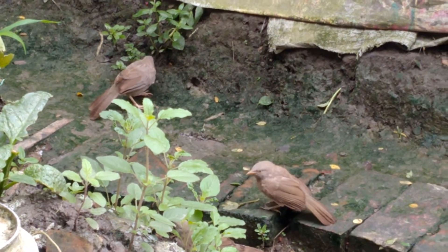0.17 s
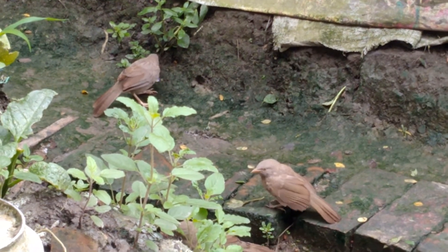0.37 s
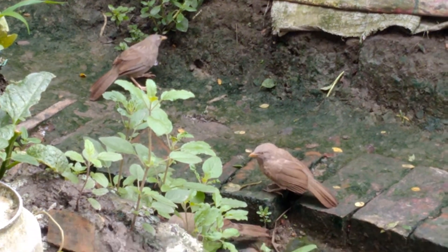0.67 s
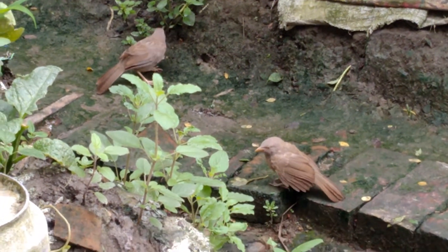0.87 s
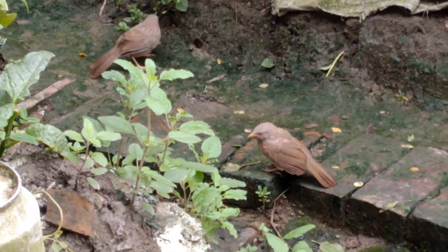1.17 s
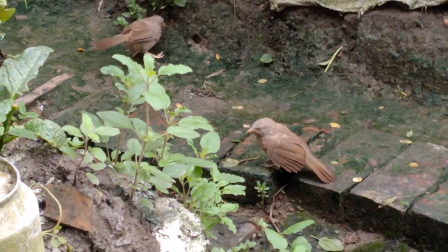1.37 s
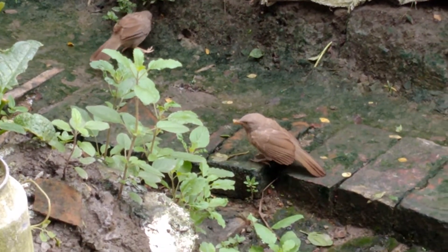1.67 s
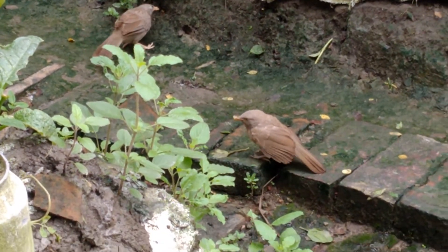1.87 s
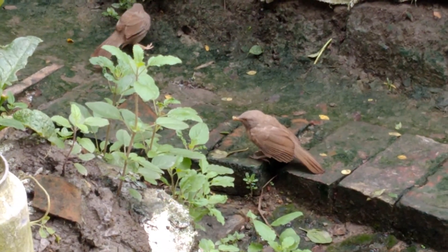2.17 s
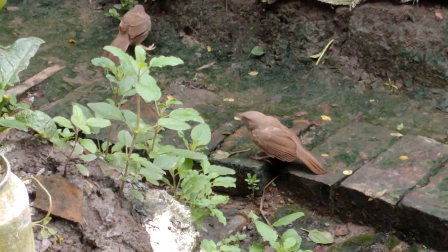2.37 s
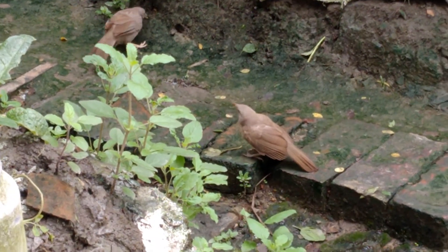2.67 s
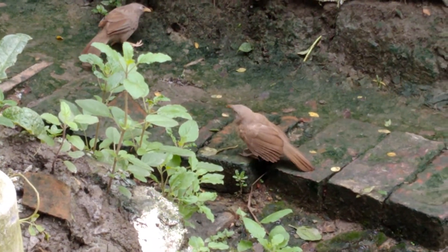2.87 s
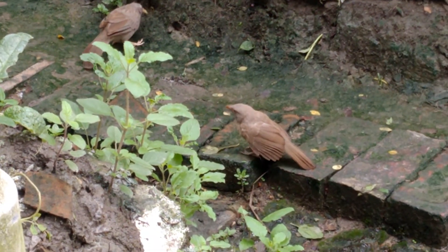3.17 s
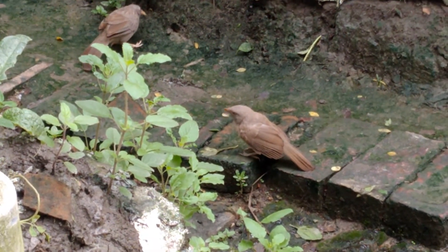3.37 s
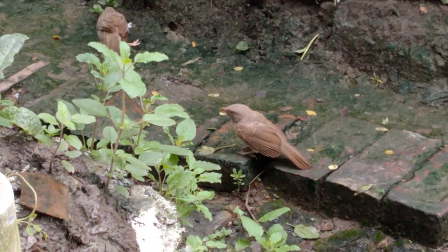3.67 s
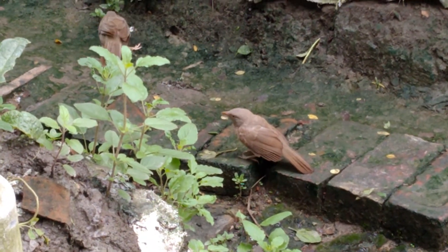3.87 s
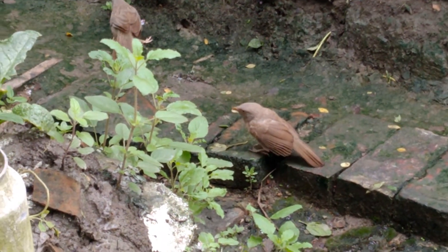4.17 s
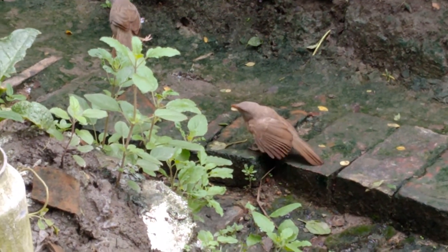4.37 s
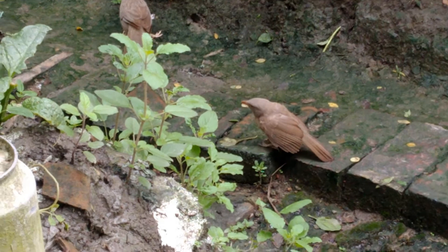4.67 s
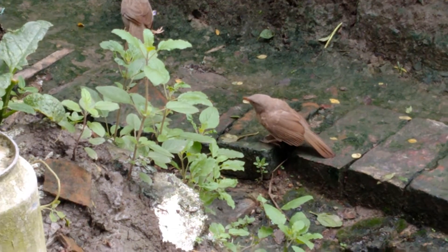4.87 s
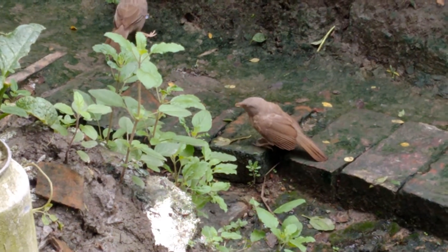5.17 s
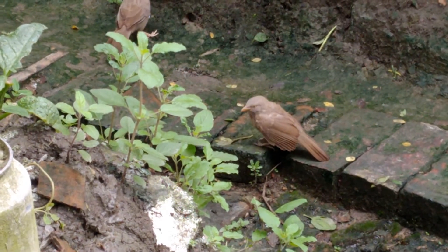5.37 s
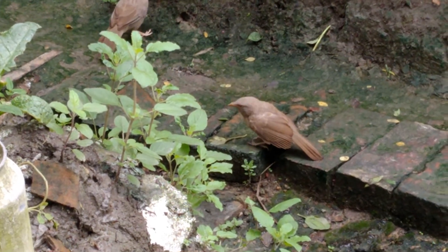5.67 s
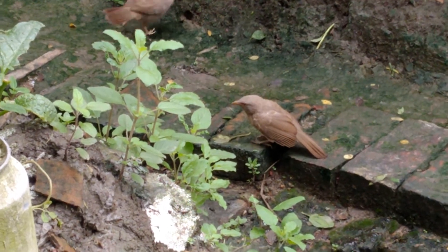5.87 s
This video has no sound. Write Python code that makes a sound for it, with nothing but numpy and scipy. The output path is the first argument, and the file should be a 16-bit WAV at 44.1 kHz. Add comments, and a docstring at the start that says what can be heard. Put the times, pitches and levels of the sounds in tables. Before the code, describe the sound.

Outdoor bird chatter heard from a few metres away: short whistled squawks that plunge and turn hoarse, arched cries cracking into rasp, tiny peeps and two soft toneless clucks. The calls are densest between about two and a half and three and a half seconds, then come in separate bursts. Brick walls and paving return a brief blurred echo, over faint rumble, airy noise, hiss and barely audible dull bumps.

```python
"""In a small brick yard, babblers chatter to each other.
Each main call is a whistle that can split into a buzz (slower cycles) or break into a rasp (chaos).
Faint peeps, two soft clucks of noise and one high, fast-trilled chip fall between them.
The walls answer with a short echo, made from fading noise.
Below lie a low rumble, the air of the yard, a thin steady hiss and a few dull bumps, all shaped noise."""
import sys
import numpy as np
from scipy import signal
from scipy.fft import rfft, irfft, next_fast_len
from scipy.io import wavfile
from scipy.ndimage import uniform_filter1d

SR = 44100
rng = np.random.default_rng(int(sys.argv[2]) if len(sys.argv) > 2 else 0)


def store_pcm(level_fs):
    """Save levels as 16-bit WAV."""
    pcm = np.round(np.clip(level_fs, -1, 1) * 32767).astype(np.int16)
    wavfile.write(sys.argv[1], SR, np.atleast_2d(pcm).T)


N = 265041  # length of the scene [samples]


def from_db(db):
    """Turn decibels into a gain."""
    return 10 ** (np.asarray(db) / 20)


def rms_one(x):
    """Scale a signal to an average power of 1."""
    return x / np.sqrt(np.mean(np.abs(x) ** 2) + 1e-20)


def gain_at(spectrum, hz):
    """Read a (frequency [Hz], level [dB]) table as a gain; beyond its ends it is -90 dB."""
    points, db = np.transpose(spectrum)
    return from_db(np.interp(np.log(hz + 1), np.log(points), db, left=-90, right=-90))


def coloured(spectrum):
    """Noise with the given balance of low and high, at power 1."""
    size = next_fast_len(N)
    hz = np.arange(size // 2 + 1) * SR / size
    white = rfft(rng.standard_normal(size))
    return rms_one(irfft(white * gain_at(spectrum, hz), size)[:N])


def flutter(rate_hz, order=2):
    """Random motion up to about the given rate, at power 1."""
    smoother = signal.butter(order, rate_hz, fs=SR, output="sos")
    return rms_one(signal.sosfilt(smoother, rng.standard_normal(N)))


def swell(start, length):
    """One smooth rise and fall, like half a sine wave."""
    return np.sin(np.pi * np.clip((np.arange(N) / SR - start) / length, 0, 1))


def controls(rows, fade_s=0.003):
    """The samples that a call covers, its soft-edged gate, and its columns joined by lines."""
    s, *columns = np.transpose(rows)
    at = np.arange(max(0, int(s[0] * SR)), min(N, int(s[-1] * SR)))
    t = at / SR
    gate = np.clip(np.minimum(t - s[0], s[-1] - t) / fade_s, 0, 1)
    return at, gate, [np.interp(t, s, c) for c in columns]


def hump(loudest, count=41):
    """Progress 0-1 through a note, and its rounded attack and release in dB."""
    attack_db, release_db = 15.5, 27.5  # how far below its peak a note starts and ends
    u, loudest = np.linspace(0, 1, count), np.clip(loudest, .05, .95)
    rising = attack_db * (1 - u / loudest) ** 2
    falling = release_db * ((u - loudest) / (1 - loudest)) ** 2
    return u, -np.where(u < loudest, rising, falling)


def note(s, hz, level_db, rasp):
    """Rows of (time [s], pitch [Hz], level [dB], rasp [0-1]) for the syrinx."""
    return np.column_stack(np.broadcast_arrays(s, hz, level_db, rasp))


def background():
    """Steady noise in three layers: a low rumble, the air of the yard and a thin hiss."""
    # low outdoor rumble: (frequency [Hz], relative level [dB])
    rumble = [(18, -78), (30, -53.5), (48, -11), (64, -7), (118, 0), (162, -6.5), (335, -5.5), (406, -10),
              (597, -7), (892, -5), (999, -3.5), (1230, -11), (1400, -14), (1820, -25), (3080, -120)]
    # middle tones of the air in the yard: (frequency [Hz], relative level [dB])
    yard_air = [(820, -47.5), (1400, -7.5), (1820, -4), (2290, -2.5), (2520, -2), (3080, -6.5), (3590, -6),
                (4170, -16), (7000, -34.5), (9100, -67.5), (15400, -120)]
    # thin high hiss: (frequency [Hz], relative level [dB])
    hiss = [(6000, -27.5), (7200, -20), (7900, -12), (8500, -0.5), (8900, -11), (9500, -22.5), (11500, -36),
            (12400, -24.5), (13200, -42), (15600, -44.5)]
    rumble_db, yard_air_db, hiss_db = -57, -51.5, -61
    out = from_db(rumble_db) * coloured(rumble)
    out += from_db(yard_air_db) * coloured(yard_air)
    return out + from_db(hiss_db) * coloured(hiss)


def bumps(width_hz=45):
    """Faint dull sounds from around the yard, each a narrow low band of noise."""
    # the bumps: (start [s], length [s], centre [Hz], relative level [dB])
    bump_rows = [(0.634, 0.048, 170, -50), (1.213, 0.12, 360, -56.5), (2.708, 0.066, 565, -51),
                 (2.725, 0.18, 385, -59.5)]
    t, out = np.arange(N) / SR, np.zeros(N)
    body = flutter(width_hz) + 1j * flutter(width_hz)
    for s, length, hz, db in bump_rows:
        band = np.real(body * np.exp(2j * np.pi * hz * t))  # lifts the slow noise up to hz
        out += from_db(db) * swell(s, length) * band
    return out


def hiss_swell(sound, top_db=-59, knee_db=-38, window_s=0.046):
    """Treble hiss that comes up a little when the birds are loud, and levels off at top_db."""
    # colour of this hiss: (frequency [Hz], relative level [dB])
    swell_colour = [(3500, -11), (4300, 4.5), (5200, -1.5), (6500, -1), (7600, 0.5), (8600, 8.5),
                    (9700, -23), (11500, -8), (13000, -22.5), (15600, -24)]
    level = np.sqrt(np.abs(uniform_filter1d(sound ** 2, int(window_s * SR))))
    return from_db(top_db) * level / (level + from_db(knee_db)) * coloured(swell_colour)


def yard(x, near_t60=0.24, far_db=-14, far_t60=0.89, gap_s=0.0027):
    """Dense echoes off near walls and paving, stronger than the direct sound, with a weak longer tail."""
    near_db = 1  # compared with the direct sound
    t = np.arange(SR) / SR
    # silent for gap_s, then building up over another gap_s
    near, far = rng.standard_normal((2, SR)) * np.clip(t / gap_s - 1, 0, 1)
    # each fades by 60 dB in its t60 seconds
    echo = from_db(near_db) * rms_one(near * from_db(-60 * t / near_t60))
    echo += from_db(far_db) * rms_one(far * from_db(-60 * t / far_t60))
    echoed = signal.fftconvolve(x, echo / np.sqrt(SR))[:N]
    return (x + echoed) / np.sqrt(1 + from_db(2 * near_db))


def clucks():
    """Low, toneless chucks with the beak nearly shut: short swells of shaped noise."""
    # the clucks: (start [s], length [s], level before the echo [dB])
    cluck_rows = [(1.455, 0.044, -32.5), (2.767, 0.052, -29)]
    # their colour: (frequency [Hz], relative level [dB])
    cluck_colour = [(290, -64), (500, -38), (1120, -16.5), (1620, -12.5), (1900, -8.5), (2140, -6.5),
                    (2280, -10), (2870, -23), (3850, -29), (4500, -41), (5850, -72), (9900, -120)]
    loudness = sum(from_db(db) * swell(s, length) ** 2 for s, length, db in cluck_rows)
    return coloured(cluck_colour) * loudness


def peeps(jitter=0.036):
    """Tiny contact peeps: gliding tones made slightly hoarse by a trembling pitch."""
    # the peeps: (start [s], length [s], start pitch [Hz], end pitch [Hz], level before the echo [dB])
    peep_rows = [(.005, 0.023, 2860, 2290, -45), (0.157, 0.023, 2710, 2390, -41),
                 (0.176, 0.041, 2600, 2220, -41.5), (0.238, 0.044, 3850, 4090, -44.5),
                 (0.306, 0.038, 3260, 2880, -43.5), (.335, 0.025, 2687, 2190, -35.5),
                 (0.379, 0.033, 2750, 2145, -37.5), (.546, 0.052, 1452, 1494, -47),
                 (.549, 0.073, 2600, 2420, -44), (1.05, 0.048, 2310, 2320, -39),
                 (1.086, 0.056, 2130, 2036, -44.5), (2.27, 0.09, 2050, 1974, -42),
                 (2.469, 0.054, 2455, 2540, -40), (4.098, 0.021, 2680, 2530, -39.5),
                 (4.949, 0.053, 1920, 2330, -48.5), (4.996, .034, 3070, 2420, -46.5),
                 (5.176, 0.048, 2020, 2075, -51)]
    out, waver = np.zeros(N), flutter(300)
    for s, length, start_hz, end_hz, level_db in peep_rows:
        at, _, (hz,) = controls([(s, start_hz), (s + length, end_hz)])
        phase = 2 * np.pi * np.cumsum(hz * (1 + jitter * waver[at])) / SR
        out[at] += from_db(level_db) * np.sqrt(2) * np.hanning(len(at)) ** .5 * np.sin(phase)
    return out


def chip(trill_hz=160, swing_hz=880, hoarse_hz=400, octave_db=-29, air_db=-28):
    """A rising note whose pitch is swung by a very fast trill."""
    # the chip: (start [s], length [s], start pitch [Hz], end pitch [Hz], bend [1 = straight],
    # level before the mix [dB], loudest at [share 0-1])
    s, length, start_hz, end_hz, bend, peak_db, loudest = (2.318, .09, 4200, 6950, 2.5, -28, .46)
    u, shape_db = hump(loudest)
    glide_hz = end_hz + (start_hz - end_hz) * (1 - u) ** bend
    at, gate, (hz, level_db) = controls(np.column_stack([s + length * u, glide_hz, peak_db + shape_db]))
    hz = hz + swing_hz * np.sin(2 * np.pi * trill_hz * at / SR) + hoarse_hz * flutter(1000)[at]
    phase, out = 2 * np.pi * np.cumsum(hz) / SR, np.zeros(N)
    tone = np.sqrt(2) * (np.sin(phase) + from_db(octave_db) * np.sin(2 * phase))
    air = from_db(air_db) * rng.standard_normal(N)[at]
    out[at] = gate * from_db(level_db) * (tone + air)
    return out


def syrinx(calls, throat, order, buzz_db, rasp_db, swing, chaos_hz, air_db):
    """A whistle whose membranes repeat only every few cycles (buzz) or vibrate chaotically (rasp)."""
    # colour of the rasping air: (frequency [Hz], relative level [dB])
    rasp_colour = [(700, -22), (1100, -15), (1500, -14.5), (2000, -21), (2450, -2.5), (3000, -1),
                   (3500, -14), (4100, -13), (4700, -37), (7500, -33.5), (11500, -46.5), (15000, -55)]
    out, waver, air = np.zeros(N), np.tanh(2 * flutter(172.0)), coloured(rasp_colour)
    chaos = rms_one(flutter(chaos_hz, order=4) + 1j * flutter(chaos_hz, order=4))
    # pitch multiples besides the whistle; with order above 1 some lie between the harmonics
    multiples = [k / order for k in range(1, 4 * order + 1) if k != order]
    for rows in calls:
        at, gate, (hz, level_db, rasp) = controls(rows)
        rasp = np.clip(rasp, 0, 1)
        # a rasping voice flips quickly between a higher and a lower pitch
        phase = 2 * np.pi * np.cumsum(hz * (1 + swing * rasp * waver[at])) / SR
        clear = np.sqrt(1 - rasp ** 2)
        # chaos shakes the height and phase of the whistle and smears it into a band
        whistle = np.real((clear + rasp * chaos[at]) * np.exp(1j * phase))
        # the throat colours the extra lines
        buzz = np.zeros(len(at))
        for m in multiples:
            buzz += gain_at(throat, hz * m) * np.cos(m * phase + rng.uniform(0, 2 * np.pi))
        # irregular closures ring the whole throat
        harsh = from_db(rasp_db) * rasp ** 2 + from_db(air_db)
        tone = np.sqrt(2) * (whistle + from_db(buzz_db) * clear * buzz)
        voice = (tone + harsh * air[at]) / np.sqrt(1 + harsh ** 2)
        out[at] += gate * from_db(level_db) * voice
    return out


def long_call(curve, crack_s, rasp_before, rasp_after, count=120):
    """A drawn-out call that grows raspier at its crack."""
    points, hz, level_db = np.transpose(curve)
    s = np.linspace(points[0], points[-1], count)
    cracked = .5 + .5 * np.tanh((s - crack_s) / .014)  # the crack takes over within about 14 ms each way
    rasp = rasp_before + (rasp_after - rasp_before) * cracked
    return note(s, np.interp(s, points, hz), np.interp(s, points, level_db), rasp)


def whine():
    """A level nasal whine that cracks near its end."""
    # its course: (time [s], pitch [Hz], level before the echo [dB])
    whine_curve = [(1.628, 2706, -42), (1.676, 2065, -32.5), (1.73, 2149, -33), (1.736, 2087, -30.5),
                   (1.848, 2013, -32.5), (1.96, 2106, -31.5), (1.984, 1952, -37.5), (2.016, 2290, -32.5),
                   (2.035, 2220, -56)]
    return long_call(whine_curve, crack_s=1.985, rasp_before=.22, rasp_after=.75)


def squeal():
    """A nasal squeal that cracks into a strong rasp."""
    # its course: (time [s], pitch [Hz], level before the echo [dB])
    squeal_curve = [(0.668, 2242, -35), (0.756, 2525, -25), (0.786, 2392, -22.5), (0.808, 2109, -30.5),
                    (0.842, 2284, -28.5), (0.872, 2105, -34.5), (0.902, 2170, -38.5), (0.918, 2330, -40),
                    (0.945, 2200, -57)]
    return long_call(squeal_curve, crack_s=.8, rasp_before=.36, rasp_after=.92)


def overtone(squeal_rows):
    """A clear second tone above the squeal follows its pitch, swells to a crest and dies quickly."""
    ratio, peak_s, peak_db = 1.148, 0.763, -25.5
    rise_db_per_s, fall_db_per_s = 243, 449
    s, hz = squeal_rows[:, 0], squeal_rows[:, 1]
    fade_db = np.maximum(rise_db_per_s * (peak_s - s), fall_db_per_s * (s - peak_s))
    return note(s, ratio * hz, peak_db - fade_db, rasp=0.075)


def cries():
    """Three long arched cries, each cracking from tone towards rasp."""
    # course of each cry: (time [s], pitch [Hz], level before the echo [dB])
    cry_1 = [(3.0, 2530, -19.5), (3.022, 2601, -18), (3.056, 2597, -19.5), (3.11, 2063, -23.5),
             (3.128, 2280, -34), (3.168, 2207, -31.5), (3.206, 2330, -31), (3.235, 2300, -46)]
    cry_2 = [(4.12, 2580, -46), (4.142, 2273, -28), (4.214, 2363, -29), (4.264, 2590, -24.5),
             (4.29, 2598, -25), (4.326, 2397, -21), (4.374, 2028, -27), (4.39, 2057, -37.5),
             (4.425, 1630, -38)]
    cry_3 = [(5.535, 2314, -27.5), (5.563, 2524, -18), (5.593, 2593, -19), (5.619, 2548, -16.5),
             (5.631, 2448, -17.5), (5.665, 2155, -19), (5.697, 2202, -33), (5.725, 2142, -23.5),
             (5.76, 2105, -56)]
    return [long_call(cry_1, crack_s=3.115, rasp_before=.27, rasp_after=.97),
            long_call(cry_2, crack_s=4.35, rasp_before=.2, rasp_after=.36),
            long_call(cry_3, crack_s=5.68, rasp_before=.28, rasp_after=.55)]


def slurs():
    """Short notes that slide straight down under one swell."""
    # the slurs: (start [s], length [s], start pitch [Hz], end pitch [Hz],
    # level before the echo [dB], loudest at [share 0-1], rasp [0-1])
    slur_rows = [ (.778, 0.0388, 2387, 2102, -23, 0.6, 0.45), (.87, 0.054, 2230, 2190, -31.5, 0.5, 0.6),
                 (1.702, 0.063, 2507, 2167, -22, 0.6, 0.37), (1.918, 0.015, 2200, 2120, -23.5, 0.3, 0.3),
                 (1.948, 0.016, 2127, 2040, -29.5, 0.4, 0.52), (1.98, 0.031, 1720, 1427, -44.5, .7, 0.3),
                 (2.656, .06, 2750, 2080, -36, 0.07, 0.52), (3.733, .042, 2052, 2030, -32, 0.06, 0.13),
                 (4.356, 0.078, 3025, 2417, -24.5, 0.73, 0.42), (4.429, 0.11, 2287, 1914, -22, 0, 0.29),
                 (4.486, .135, 3802, 2550, -29.5, 0.79, 0.7), (4.517, 0.082, 1837, 1337, -40.5, 0.5, 0.38),
                 (5.665, 0.046, 2550, 2380, -20, 0.1, 0.8), (5.712, 0.029, 2248, 2223, -17.5, 0.63, 0.2),
                 (5.729, 0.079, 5170, 3500, -44.5, 0.63, 0.9), (5.748, 0.08, 2953, 2670, -33.5, 0.15, 0.92)]
    notes = []
    for s, length, start_hz, end_hz, level_db, loudest, rasp in slur_rows:
        u, shape_db = hump(loudest)
        hz = start_hz + (end_hz - start_hz) * u
        notes.append(note(s + length * u, hz, level_db + shape_db, rasp))
    return notes


def squawks():
    """A held whistle sags a little, catches, then plunges and grows hoarse."""
    # the squawks: (break [s], held for [s], held pitch at its end [Hz], held level before the echo [dB],
    # drop length [s], end pitch [Hz], bend [1 = straight], drop level before throat and echo [dB],
    # loudest at [share 0-1 of the drop], full rasp [0-1])
    squawk_rows = [ (1.197, .044, 2540, -30.5, .1, 1800, 1.5, -27, 0.28, 0.17),
                   (2.118, .035, 3370, -52.5, 0.15, 1930, 2.7, -20.5, 0.45, 0.27),
                   (2.577, 0.056, 2792, -30.5, 0.073, 1785, 1.7, -18.5, 0.16, 0.55),
                   (2.931, 0.053, 2730, -27.5, 0.079, 2293, 2.1, -19, 0.49, 0.69),
                   (3.317, 0.046, 2792, -25, .064, 1915, 2.2, -17, 0.15, 0.44),
                   (3.727, 0.059, 2717, -29.5, .054, 1798, 2.0, -29.5, 0.45, 0.63),
                   (5.374, .056, 5673, -53.5, .168, 2141, 2.8, -22.5, 0.88, 0.7),
                   (5.846, 0.065, 2626, -33.5, 0.082, 1770, 1.9, -25.5, 0.12, 0.58)]
    held_rasp, held_sag_hz_per_s, held_loudest = .11, 1600, .74
    catch_s = 0.0017  # the voice catches between the held note and the drop
    break_rasp_share = 0.61  # share of the full rasp at the break
    # a drop is weaker while above the throat's resonance
    throat_top_hz, above_throat_db_per_octave = 2540, -16.5
    notes = []
    for s, held_s, held_hz, held_db, drop_s, end_hz, bend, drop_db, loudest, rasp in squawk_rows:
        u, shape_db = hump(held_loudest)
        left_s = (held_s - catch_s) * (1 - u)  # time left in the held note
        sagging_hz = held_hz + held_sag_hz_per_s * left_s
        notes.append(note(s - catch_s - left_s, sagging_hz, held_db + shape_db, held_rasp))
        u, shape_db = hump(loudest)
        hz = end_hz + (held_hz - end_hz) * (1 - u) ** bend
        throat_db = above_throat_db_per_octave * np.maximum(np.log2(hz / throat_top_hz), 0)
        hoarse = rasp * np.interp(u, [0, .5], [break_rasp_share, 1])
        notes.append(note(s + drop_s * u, hz, drop_db + shape_db + throat_db, hoarse))
    return notes


def birds():
    """All the syrinx calls: a relaxed throat for squawks, slurs and cries, a tight one for nasal calls."""
    # throat and open beak, relaxed: (frequency [Hz], relative level [dB])
    relaxed = [(600, -49), (1000, -32.5), (1300, -19.5), (1600, -30), (2100, -9), (2500, -11),
               (3000, -16.5), (3500, -19.5), (4000, -19), (4600, -44.5), (7400, -37), (9500, -49),
               (11300, -43), (15000, -44)]
    # throat and open beak, tight: (frequency [Hz], relative level [dB])
    tight = [(400, -68), (700, -47), (1030, -18.5), (1400, -23.5), (1750, -10.5), (2350, -2.5),
             (2750, -5.5), (3080, -2.5), (3430, -15), (3800, -8), (4150, -15.5), (4800, -43.5), (7400, -33),
             (9000, -38.5), (15000, -53)]
    squeal_rows = squeal()
    clear_calls = squawks() + slurs() + [overtone(squeal_rows)]
    # the buzz repeats at the pitch divided by order
    out = syrinx(clear_calls, relaxed, order=1, buzz_db=-6, rasp_db=-14,
                 swing=.11, chaos_hz=300, air_db=-26)
    out += syrinx(cries(), relaxed, order=2, buzz_db=-6, rasp_db=-1,
                  swing=.03, chaos_hz=370, air_db=-23)
    out += syrinx([squeal_rows], tight, order=4, buzz_db=-6, rasp_db=-4,
                  swing=.014, chaos_hz=380, air_db=-15)
    out += syrinx([whine()], tight, order=6, buzz_db=-7, rasp_db=0,
                  swing=.03, chaos_hz=300, air_db=-13)
    return out


def scene():
    """The birds and their echoes in the yard, over the background."""
    voices = birds() + peeps() + clucks()
    close = from_db(-7) * chip()  # the chip comes from near by: more direct sound than echo
    heard = yard(voices + close) + close
    return (heard + hiss_swell(heard) + bumps() + background())[None]


def record(dry, low_cut_hz=66, cutoff_hz=15700):
    """The microphone drops the deep bass; the top is cut steeply."""
    thin = signal.sosfilt(signal.butter(3, low_cut_hz, "high", fs=SR, output="sos"), dry)
    return signal.sosfilt(signal.ellip(12, .1, 90, cutoff_hz, fs=SR, output="sos"), thin)


dry = scene()
out = record(dry)
store_pcm(out)
```